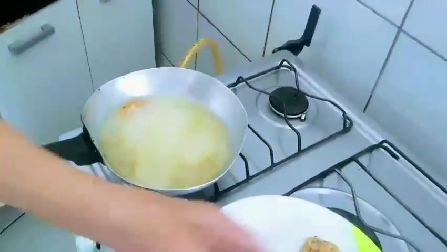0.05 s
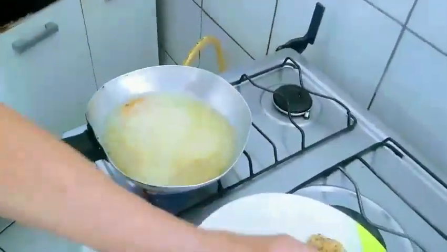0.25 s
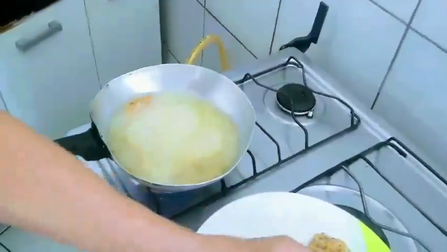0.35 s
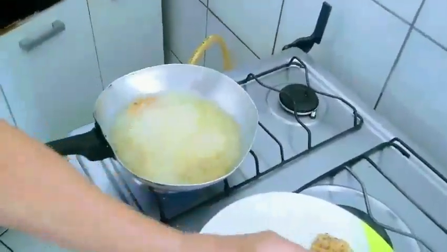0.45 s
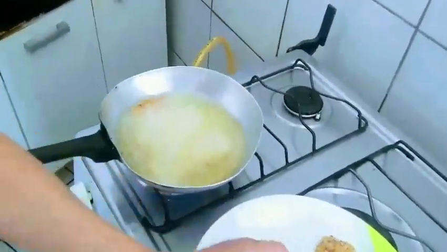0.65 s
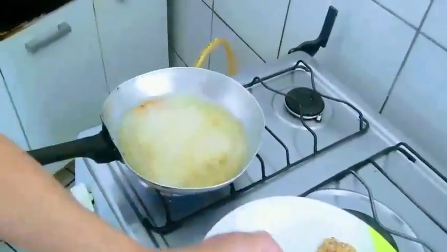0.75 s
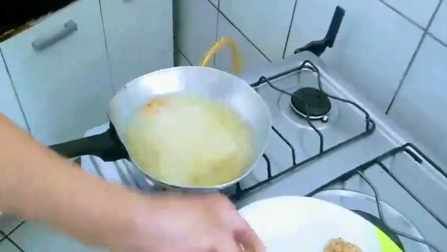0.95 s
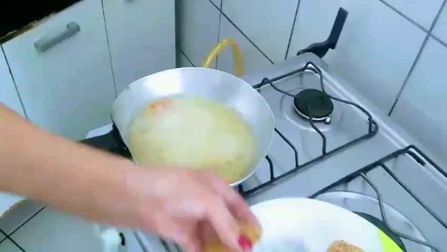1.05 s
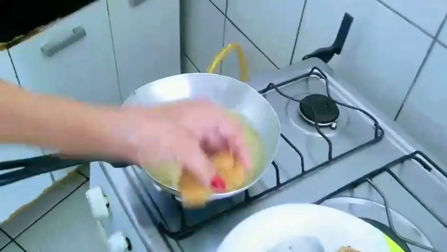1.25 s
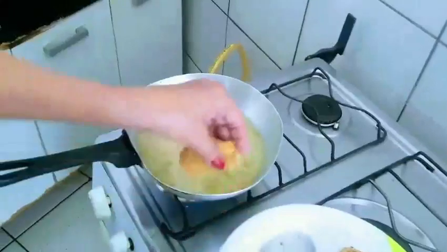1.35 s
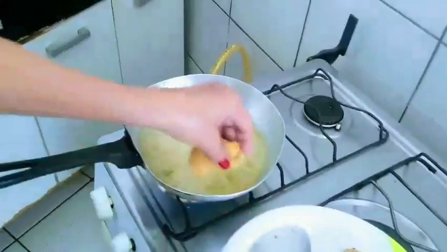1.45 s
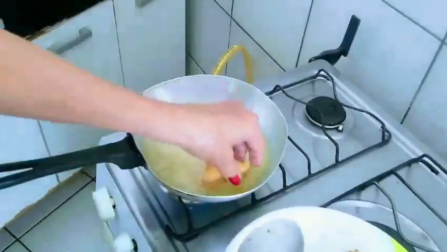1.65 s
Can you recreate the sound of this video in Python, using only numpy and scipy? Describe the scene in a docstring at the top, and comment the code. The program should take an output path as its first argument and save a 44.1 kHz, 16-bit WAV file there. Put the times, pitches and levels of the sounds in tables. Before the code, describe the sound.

Hot oil sizzles in a metal pan while a plate clanks on the stove top

```python
"""Frying oil and a clanking plate

Hot oil sizzles in a metal pan in a small tiled kitchen: fizz noise, clustered damped grains and single spits
over a low simmer, with one soft low gurgle. A hand reaches into a plate, which clanks on the stove top and
clinks once more, built from swelling modes, a crack and a clatter; noise knocks sharpen the clank and the
clink, and lighter ones follow as it picks up a breaded piece. The sizzle grows softer as the arm moves
over the pan. Two closely spaced microphone ports hear it."""
import sys
import numpy as np
from scipy import signal
from scipy.fft import rfft, irfft
from scipy.io import wavfile

SR = 44100
rng = np.random.default_rng(int(sys.argv[2]) if len(sys.argv) > 2 else 0)


def store_pcm(level_fs):
    """Save levels as 16-bit WAV."""
    pcm = np.round(np.clip(level_fs, -1, 1) * 32767).astype(np.int16)
    wavfile.write(sys.argv[1], SR, np.atleast_2d(pcm).T)


N = 74970  # length [samples]

# Loudness of the oil: (time [s], sizzle level [dB], simmer level [dB])
OIL_LEVELS = [(0, -36, -40.5), (.1, -39, -40.5), (.35, -39, -39.5), (.7, -42, -39), (.85, -44, -43),
              (1.04, -43, -41.5), (1.36, -49, -44), (1.5, -49, -45.5), (1.58, -44, -42.5),
              (1.7, -53.5, -47)]
# Tone of the fizz and crackle: (frequency [Hz], relative density [dB per Hz])
SIZZLE_SPECTRUM = [(300, -24), (1200, -3.5), (2200, -7.5), (2600, 5.5), (3300, 2.5), (5700, 2.5),
                   (7800, -2.5), (9600, -7.5), (12500, -16), (15800, -41)]
# Tone of the low simmer: (frequency [Hz], relative density [dB per Hz])
SIMMER_SPECTRUM = [(110, -26), (240, -5), (420, -12.5), (590, 4), (850, -5), (1090, 0.5), (1330, -5.5),
                   (1700, 0), (2100, -6), (6000, -28.5)]
# Tone of the plate's first hard contact: (frequency [Hz], relative density [dB per Hz])
CRACK_SPECTRUM = [(150, -23.5), (400, -11), (850, 4.5), (1350, -3.5), (3000, -0.5), (4500, -8), (6100, -7),
                  (7200, -11), (14500, -25.5)]
# Tone of the sheet metal's clatter: (frequency [Hz], relative density [dB per Hz])
CLATTER_SPECTRUM = [(120, -26.5), (260, 4), (330, -8), (420, 6), (800, 0), (1300, -17.5), (1800, 1.5),
                    (6000, -9), (14500, -26)]
# Single spits of oil: (time [s], level [dB], centre [Hz])
SPIT_EVENTS = [(0.018, -26, 6800), (0.0408, -21.5, 4860), (0.1023, -26.5, 6350), (0.433, -28.5, 4140),
               (.479, -27, 5510), (0.4958, -26, 6760), (0.679, -26.5, 4500), (0.689, -28, 5240),
               (0.735, -33.5, 4840), (0.928, -26.5, 4800), (0.966, -33, 9000), (1.034, -25, 5240),
               (1.106, -29, 5400), (1.156, -21.5, 5300), (1.651, -37, 7500)]
# Damped knocks of plate, hand and food, and one soft low gurgle of the oil at .951 s:
# (time [s], level [dB], centre [Hz], width to each side [octaves], 60 dB decay [s])
KNOCK_AND_GURGLE_EVENTS = [(0.202, -16, 770, 0.31, 0.022), (0.556, -19.5, 2560, 0.16, 0.021),
                           (0.5562, -24, 1120, 0.26, 0.026), (.562, -35.5, 2950, 0.27, 0.22),
                           (0.575, -31.5, 1140, 0.22, 0.08), (0.8552, -25.5, 1520, 0.84, 0.044),
                           (0.867, -30, 2200, 0.86, 0.059), (0.948, -30.5, 1680, 0.77, 0.036),
                           (.951, -46, 298, 0.46, 0.25), (1.217, -37.5, 574, 0.12, 0.11),
                           (1.519, -34.5, 900, 1, 0.035), (1.55, -32.5, 940, 0.85, 0.079),
                           (1.561, -37.5, 314, 0.25, 0.043)]
# Ringing modes of the plate, before a blow's pitch ratio:
# (frequency [Hz], relative level [dB], 60 dB decay [s])
PLATE_MODES = [(383, -33, 0.48), (512, -16.5, .41), (631, -35, 0.6), (675, -35, .72), (780, -30, .33),
               (912, -33, 0.42), (1082, -19.5, .3), (1867, -30, 0.23), (2945, -17.5, 0.17),
               (3425, -32.5, 0.28), (5920, -26, 0.14), (6160, -16.5, 0.08)]
# Blows on the plate:
# (time [s], ring level [dB], lowest strong mode [Hz], highest strong mode [Hz], pitch ratio [-])
PLATE_BLOWS = [(0.2029, -3, 100, 11900, 1.0), (.558, -4.5, 1070, 1950, 1.018)]
# Dying of the clatter: (frequency [Hz], 60 dB decay [s])
CLATTER_DECAY = [(600, 0.74), (2000, 0.38), (14000, 0.46)]
# Dying of the tiled room's echoes: (frequency [Hz], 60 dB decay [s])
ROOM_DECAY = [(1500, 0.38), (14000, 0.17)]
# Phase between the ports: (frequency [Hz], lead of the left [rad])
PORT_LEAD = [(400, 0.84), (900, -0.93), (1500, .5), (1900, 3), (2230, 3), (3050, 5), (3450, 6), (4700, 3.5),
             (5500, 6), (6600, 9.5), (7300, 9.5), (7800, 16), (15000, 26.5)]
# Likeness of the two ports: (frequency [Hz], correlation [0-1])
PORT_LIKENESS = [(30, 0.043), (450, 0.45), (1100, 1), (1700, 0.41), (2080, 0.97), (2450, 0.96),
                 (3050, 0.35), (4600, 0.74), (10000, 0.15)]
# Level between the ports: (frequency [Hz], left minus right [dB])
PORT_TILT = [(60, 3.5), (520, 1.5), (1100, -0.5), (1650, 6), (2200, 0), (3800, -2), (8000, -.5)]

# Sizzle: fizz and crackle are set against the sizzle level
FIZZ_DB, CRACKLE_DB, CRACKLE_ROOM_DB = -6, -3.5, -2
CRACKLE_PER_S, CRACKLE_SPREAD_DB = 1600, 7
CLUSTER_DRIFT_HZ, CLUSTER_DB = 50, 5  # bubbles burst in irregular bunches
FLURRY_DB, FLURRY_T60 = -14, 0.04  # fine pops set off by each spit: dB against the spit, s
# Simmer: noise and bubbles are set against the simmer level
SIMMER_NOISE_DB, BUBBLE_DB, BUBBLE_ROOM_DB = -4.5, -1, -2.0
BUBBLES_PER_S, BUBBLE_SPREAD_DB = 800, 5
SPIT_T60, SPIT_ROOM_DB, SPIT_OCTAVES = 0.011, -6, 0.45  # s, dB, octaves to each side
KNOCK_ROOM_DB = -10
CLANK_S, CRACK_DB, CRACK_T60 = .2028, -17.5, 0.065  # s, dB, s
CLATTER_DB, CLATTER_RISE_S = -23.5, 0.016
SWELL_CYCLES = 24  # each mode builds up over this many cycles of its table pitch
WAVER_DRIFT_HZ, WAVER_HZ, WAVER_DB = 26.5, 6.5, 3.4  # the rocking contact makes the ring uneven
SETTLE_S, SETTLE_FALL_S, SETTLE_DB = 0.061, 0.0088, -5  # the plate comes to rest and its ring drops
CUTOFF_HZ = 15800


def amp(db):
    """Turns decibels into gain."""
    return 10 ** (np.asarray(db) / 20)


def unit(x):
    """Scales to an rms of one."""
    return x / np.sqrt(np.mean(x ** 2) + 1e-20)


def read(points, hz):
    """Reads a table on a log-frequency axis."""
    f, value = np.transpose(points)
    return np.interp(np.log(hz + 1), np.log(f + 1), value)


def since(start):
    """Counts seconds since a moment, zero before it."""
    return np.maximum(np.arange(N) / SR - start, 0)


def colour(x, spectrum):
    """Shapes the tone with a causal, minimum-phase filter of the given spectrum."""
    size = 2 * N
    log_gain = np.log(amp(read(spectrum, abs(np.fft.fftfreq(size, 1 / SR)))))
    response = np.exp(np.conj(signal.hilbert(log_gain)))[:N + 1]
    return irfft(rfft(x, size) * response)[..., :N]


def noise(spectrum):
    """Makes two unrelated coloured noises: the part the ports share and the part they do not."""
    return unit(colour(rng.standard_normal((2, N)), spectrum))


def drift(cutoff_hz):
    """Makes two slow random curves of rms one, by smoothing noise."""
    hz = np.fft.rfftfreq(N, 1 / SR)
    spectrum = rfft(rng.standard_normal((2, N))) * np.exp(-(hz / cutoff_hz) ** 2)
    return unit(irfft(spectrum, N))


def fade(x, start, t60s):
    """Lets each band die at its own speed after a moment."""
    hz, t, z = signal.stft(x, SR, nperseg=256)
    z = z * amp(-60 * np.maximum(t - start, 0) / read(t60s, hz)[:, None])
    return signal.istft(z, SR, nperseg=256)[1][:, :x.shape[1]]


def strike(start, t60, rise_s=.0004):
    """Shapes a blow: a quick linear rise and an exponential fall."""
    t = since(start)
    return np.minimum(t / rise_s, 1) * amp(-60 * t / t60)


def kitchen(x, wet_db):
    """Adds the dense echoes of the tiled walls as random taps that die band by band."""
    size = SR // 2
    taps = rng.standard_normal((2, size)) * (rng.random((2, size)) < .1)
    taps = taps * (np.arange(size) > .003 * SR)  # the first echoes arrive after 3 ms
    tail = fade(taps, 0, ROOM_DECAY)
    echoes = signal.fftconvolve(x, tail / np.linalg.norm(tail[0]), axes=1)[:, :N]
    return x + amp(wet_db) * echoes


def burst(start, db, hz, octaves, t60):
    """Makes a short dying rattle: noise through one broad resonance."""
    envelope = amp(db) * strike(start, t60)
    edges = np.minimum(hz * 2. ** np.array([-octaves, octaves]), .45 * SR)
    band = signal.butter(2, edges, "bandpass", fs=SR, output="sos")
    sound = signal.sosfilt(band, envelope * rng.standard_normal((2, N)) + 1e-18)
    # the filtered burst keeps the energy of its envelope
    return sound * np.linalg.norm(envelope) / np.linalg.norm(sound, axis=1, keepdims=True)


def grains(per_s, spread_db, low_hz, high_hz, cycles, count=32):
    """Bubbles of many pitches and sizes burst in clusters, each a short damped ring."""
    t = np.arange(1500) / SR
    out = np.zeros((2, N))
    crowding = amp(CLUSTER_DB * drift(CLUSTER_DRIFT_HZ)[0])
    chance = per_s / count / SR * crowding / crowding.mean()
    for hz in np.geomspace(low_hz, high_hz, count):
        sizes = amp(spread_db * np.minimum(rng.exponential(1, N), 3))
        clicks = sizes * (rng.random(N) < chance)
        tone = np.sin(2 * np.pi * (hz * t + rng.random((2, 1))))
        ring = np.exp(-t * hz / cycles) * tone
        out += signal.oaconvolve(clicks[None], ring * hz, axes=1)[:, :N]
    return unit(out)


def oil():
    """Fine fizz and crackle at the surface, livelier after each spit, over a simmer of larger bubbles."""
    times, sizzle_db, simmer_db = np.transpose(OIL_LEVELS)
    crackle = grains(CRACKLE_PER_S, CRACKLE_SPREAD_DB, low_hz=1505, high_hz=15000, cycles=2.96)
    crackle = unit(colour(kitchen(crackle, CRACKLE_ROOM_DB), SIZZLE_SPECTRUM))
    bubbles = grains(BUBBLES_PER_S, BUBBLE_SPREAD_DB, low_hz=380.6, high_hz=3240, cycles=2.25)
    bubbles = unit(colour(kitchen(bubbles, BUBBLE_ROOM_DB), SIMMER_SPECTRUM))
    sizzle = amp(FIZZ_DB) * noise(SIZZLE_SPECTRUM) + amp(CRACKLE_DB) * crackle
    simmer = amp(SIMMER_NOISE_DB) * noise(SIMMER_SPECTRUM) + amp(BUBBLE_DB) * bubbles
    liveliness = sum(amp(db + FLURRY_DB) * strike(s, FLURRY_T60) for s, db, hz in SPIT_EVENTS)
    sizzle_gain = amp(np.interp(since(0), times, sizzle_db))
    simmer_gain = amp(np.interp(since(0), times, simmer_db))
    return crackle * liveliness + sizzle * sizzle_gain + simmer * simmer_gain


def spits():
    """Water drops burst in the oil with sharp ticks, each of its own pitch."""
    ticks = sum(burst(s, db, hz, SPIT_OCTAVES, SPIT_T60) for s, db, hz in SPIT_EVENTS)
    return kitchen(ticks, SPIT_ROOM_DB)


def knocks_and_gurgle():
    """Short damped contacts of plate, hand and food and one soft oil gurgle, echoed by the room."""
    return kitchen(sum(burst(*row) for row in KNOCK_AND_GURGLE_EVENTS), KNOCK_ROOM_DB)


def clank():
    """The crack of the plate meeting the stove top, and the sheet metal's dense clatter after it."""
    blow = amp(CRACK_DB) * strike(CLANK_S, CRACK_T60)
    crack = unit(colour(blow * rng.standard_normal((2, N)), CRACK_SPECTRUM))
    crack = crack * np.sqrt(np.mean(blow ** 2))
    rise = np.minimum(since(CLANK_S) / CLATTER_RISE_S, 1)
    clatter = fade(noise(CLATTER_SPECTRUM), CLANK_S, CLATTER_DECAY) * rise
    return crack + amp(CLATTER_DB) * clatter


def plate_ring():
    """The plate's modes swell and waver while it chatters on the metal, then drop as it settles."""
    out = np.zeros((2, N))
    for s, blow_db, low_hz, high_hz, ratio in PLATE_BLOWS:
        t = since(s)
        settle = amp(SETTLE_DB * np.clip((t - SETTLE_S) / SETTLE_FALL_S, 0, 1))
        for hz, db, t60 in PLATE_MODES:
            bend, throb = drift(WAVER_DRIFT_HZ)
            wander = WAVER_HZ * np.cumsum(bend) / SR
            turn = 2 * np.pi * (hz * ratio * t + wander + rng.random())
            reach = 1 + (low_hz / hz) ** 4 + (hz / high_hz) ** 4  # weakens modes outside the blow's range
            level = amp(db + blow_db + WAVER_DB * throb) / reach
            envelope = level * settle * strike(s, t60, SWELL_CYCLES / hz)
            # the part the ports do not share is softer and lags
            tone = np.array([np.sin(turn), amp(-5) * np.sin(turn - .8)])
            out += envelope * np.sqrt(2) * tone
    return out


def ports(pair):
    """Blends the shared and unshared parts into left and right, with the ports' phase and balance."""
    hz = np.fft.rfftfreq(2 * N, 1 / SR)
    shared, apart = rfft(pair, 2 * N)
    same = np.clip(read(PORT_LIKENESS, hz), 0, 1)
    shared = shared * np.sqrt((1 + same) / 2)
    apart = apart * np.sqrt((1 - same) / 2)
    # each port takes half of the level and phase difference
    lean = amp(read(PORT_TILT, hz) / 2) * np.exp(.5j * read(PORT_LEAD, hz))
    return irfft(np.array([(shared + apart) * lean, (shared - apart) / lean]))[:, :N]


def scene():
    """Mixes oil, knocks and plate as heard at the two ports."""
    return ports(oil() + spits() + knocks_and_gurgle() + clank() + plate_ring())


def record(dry):
    """Limits the band with the recorder's steep low-pass."""
    lowpass = signal.firwin(301, CUTOFF_HZ, window=("kaiser", 9), fs=SR)
    return signal.oaconvolve(dry, lowpass[None], "same")


dry = scene()
out = record(dry)
store_pcm(out)
```